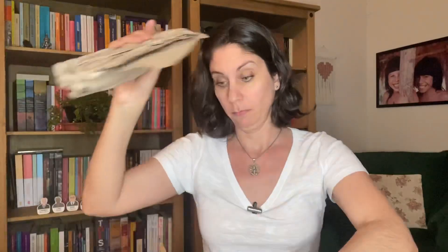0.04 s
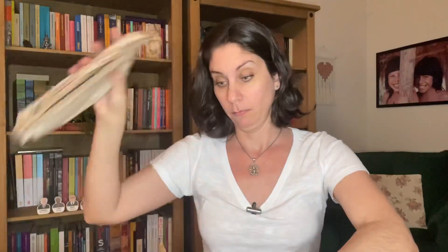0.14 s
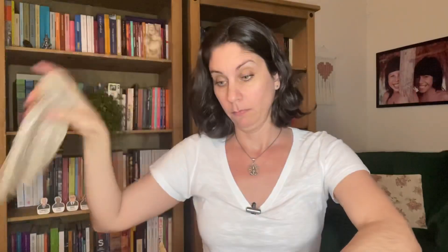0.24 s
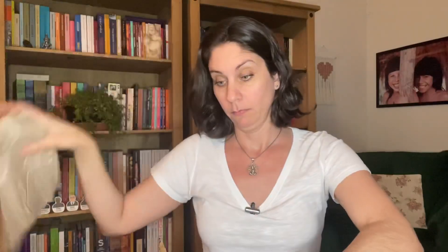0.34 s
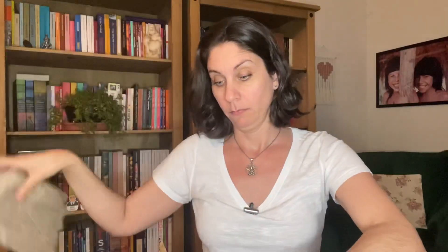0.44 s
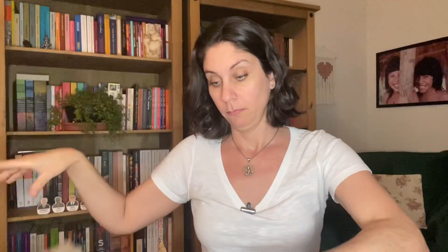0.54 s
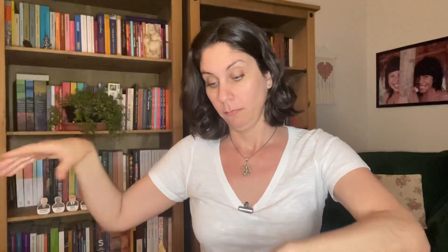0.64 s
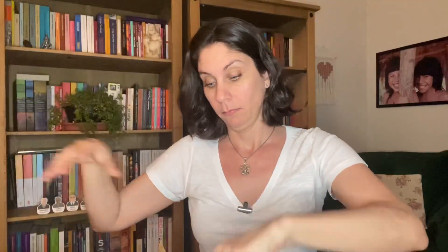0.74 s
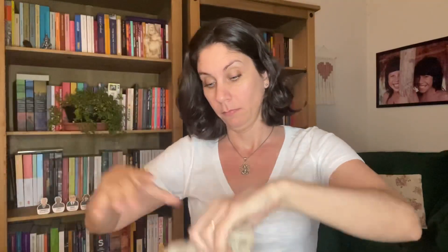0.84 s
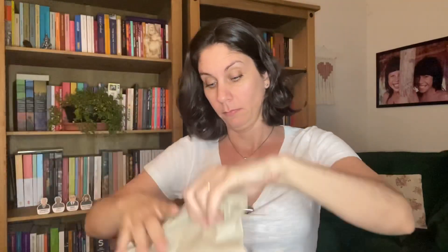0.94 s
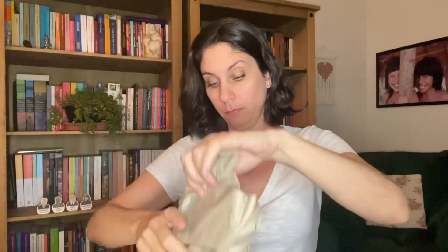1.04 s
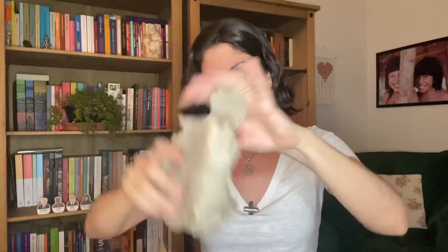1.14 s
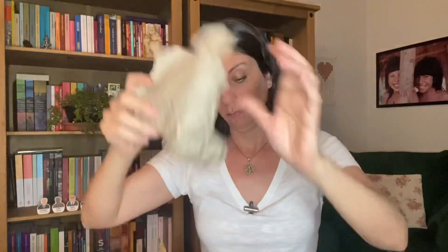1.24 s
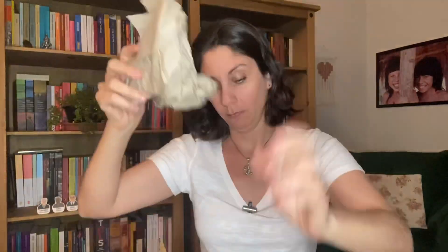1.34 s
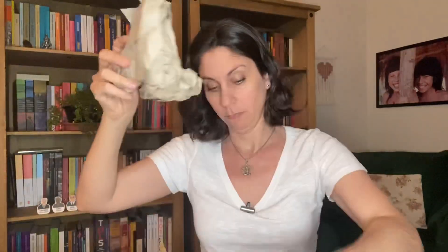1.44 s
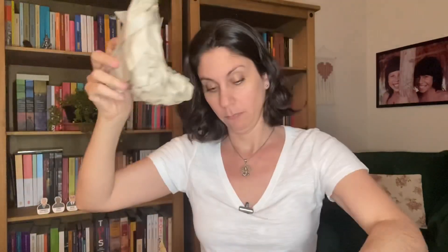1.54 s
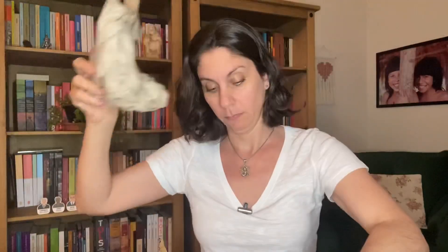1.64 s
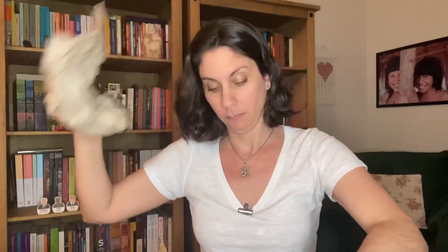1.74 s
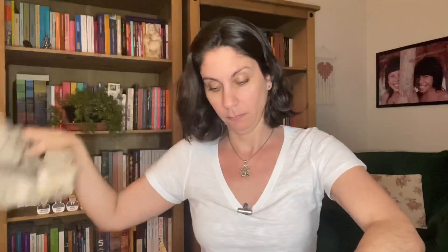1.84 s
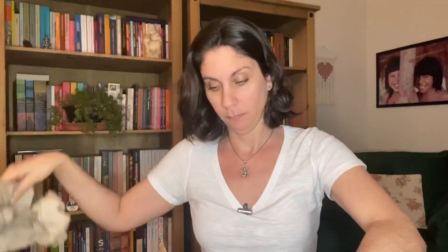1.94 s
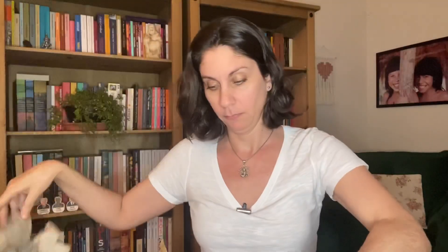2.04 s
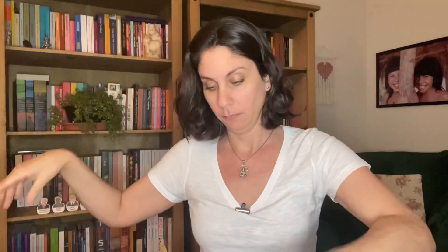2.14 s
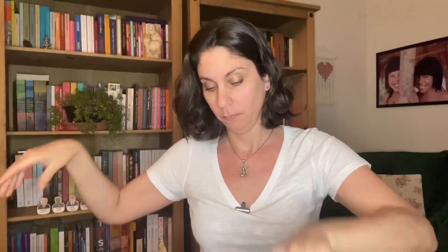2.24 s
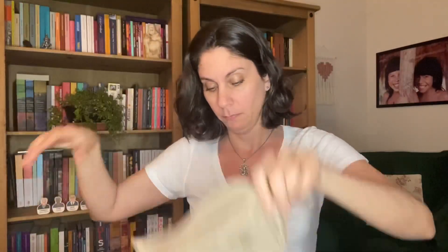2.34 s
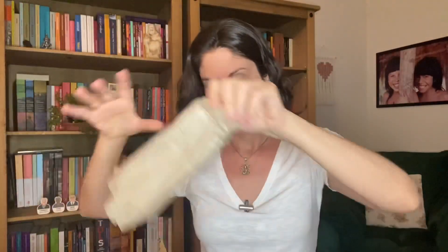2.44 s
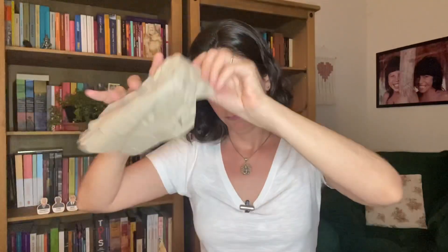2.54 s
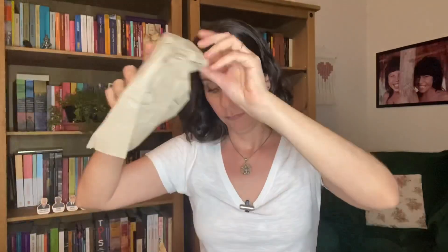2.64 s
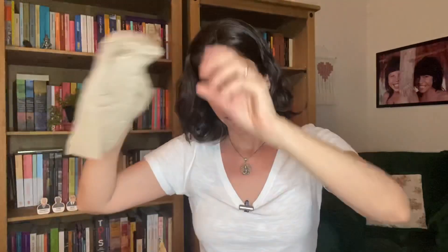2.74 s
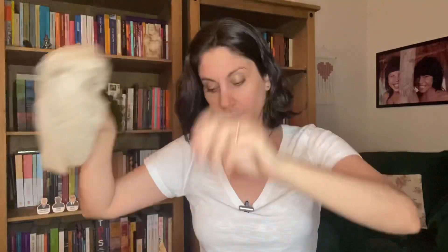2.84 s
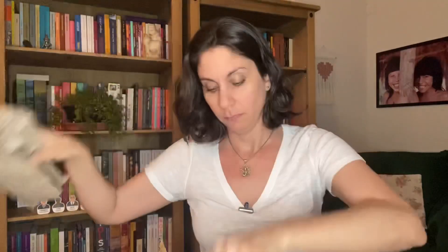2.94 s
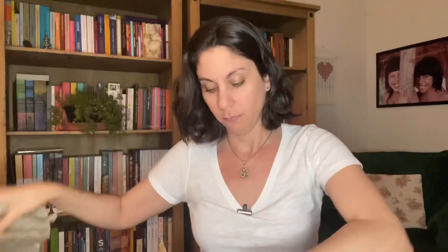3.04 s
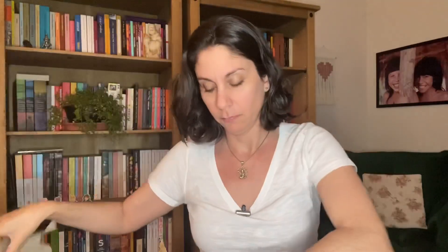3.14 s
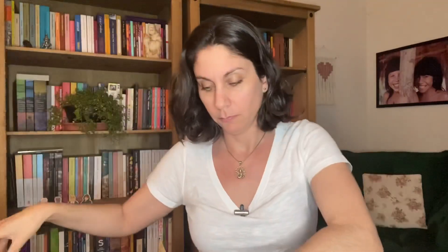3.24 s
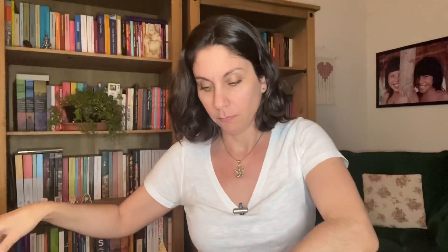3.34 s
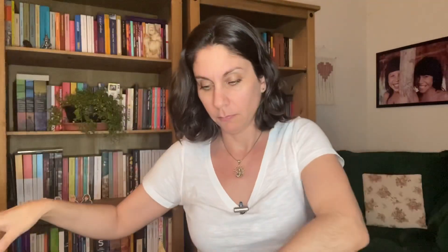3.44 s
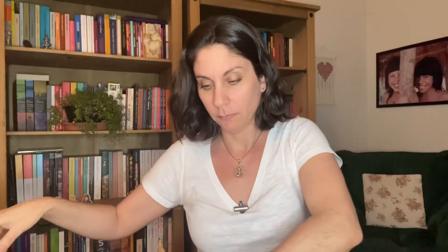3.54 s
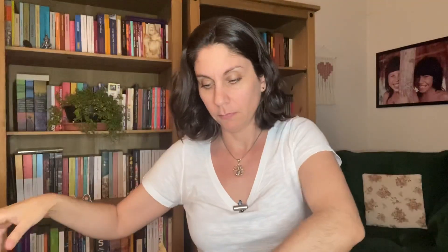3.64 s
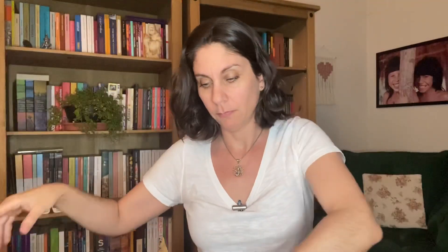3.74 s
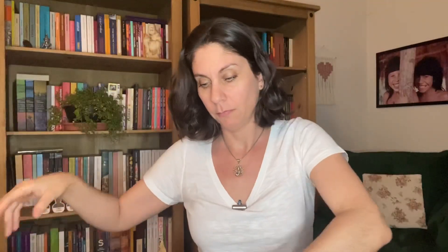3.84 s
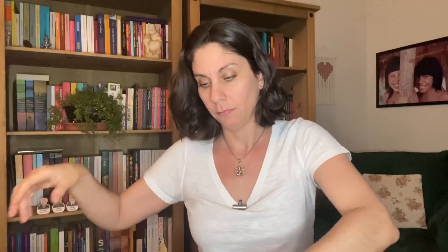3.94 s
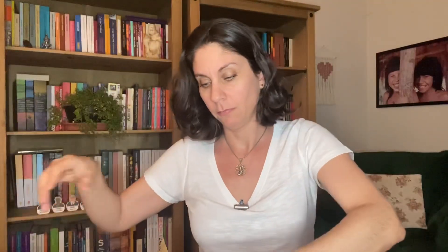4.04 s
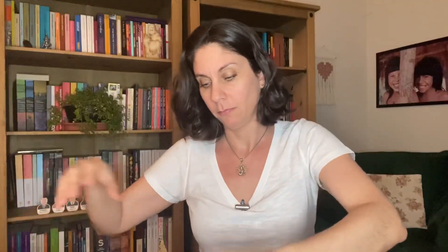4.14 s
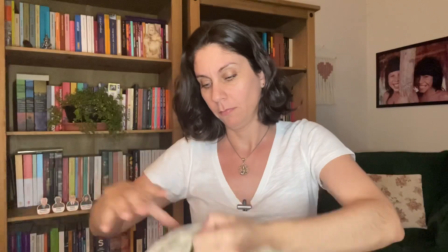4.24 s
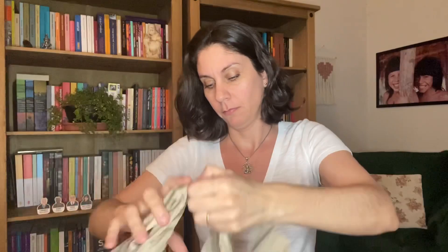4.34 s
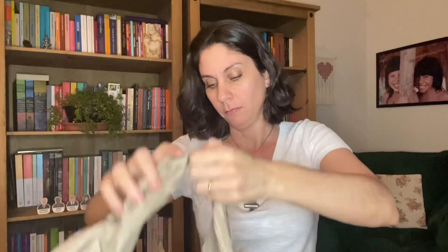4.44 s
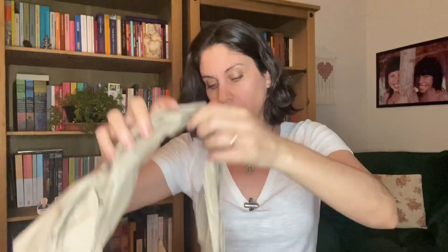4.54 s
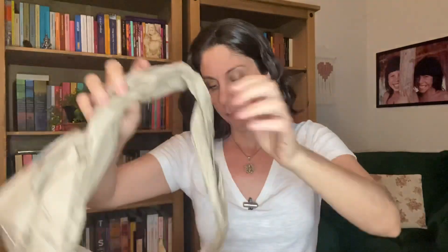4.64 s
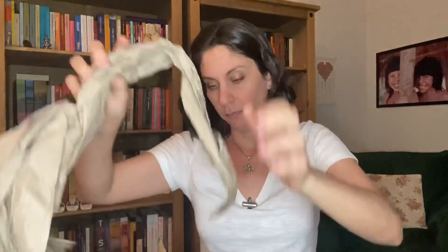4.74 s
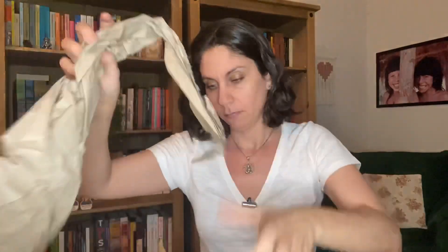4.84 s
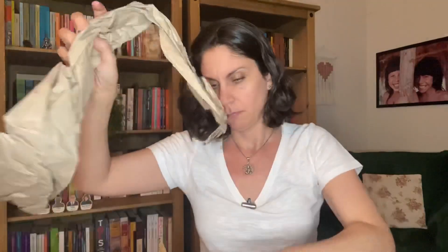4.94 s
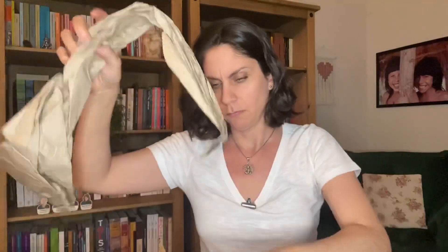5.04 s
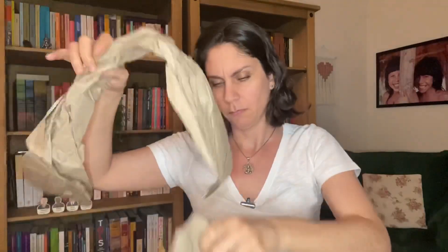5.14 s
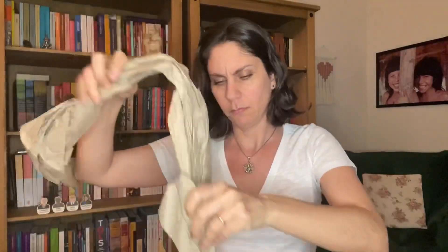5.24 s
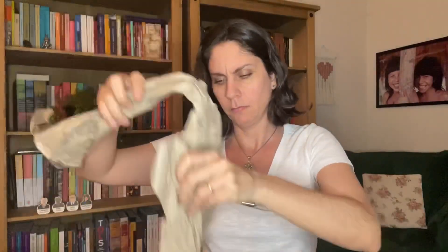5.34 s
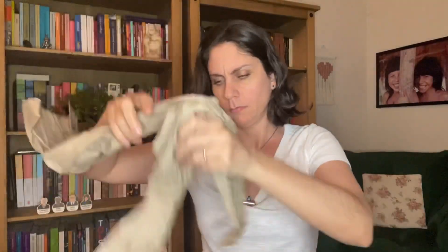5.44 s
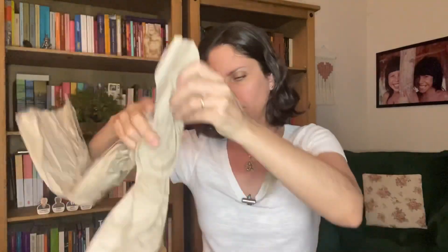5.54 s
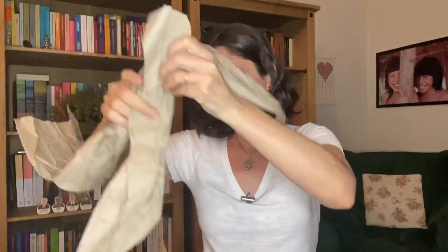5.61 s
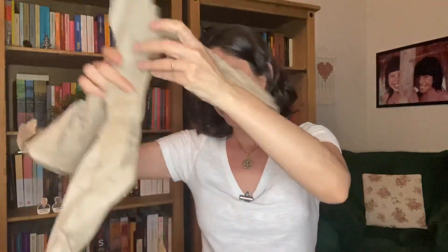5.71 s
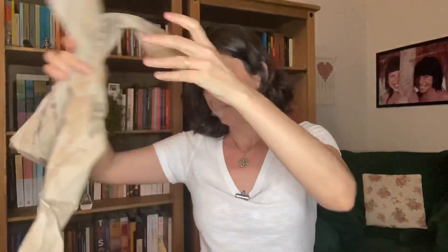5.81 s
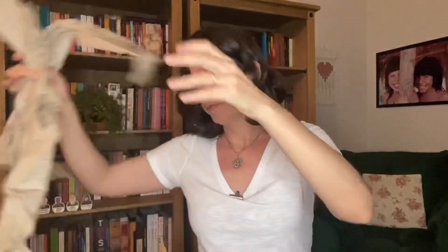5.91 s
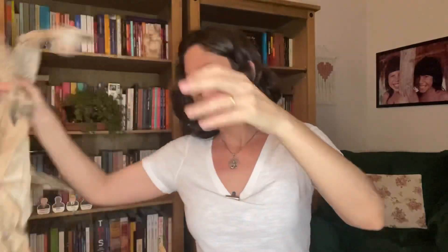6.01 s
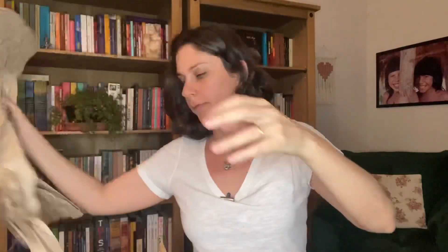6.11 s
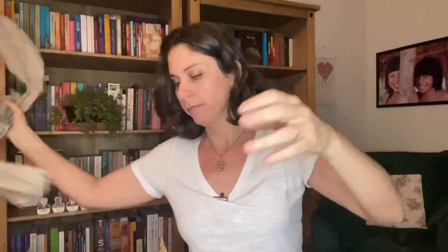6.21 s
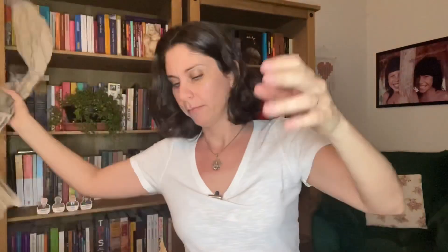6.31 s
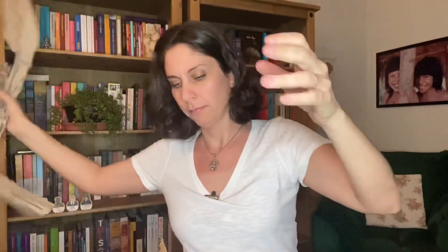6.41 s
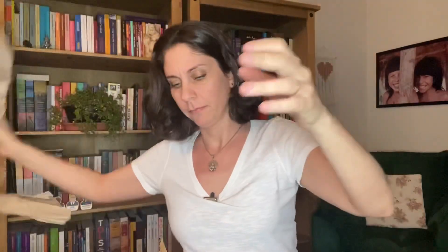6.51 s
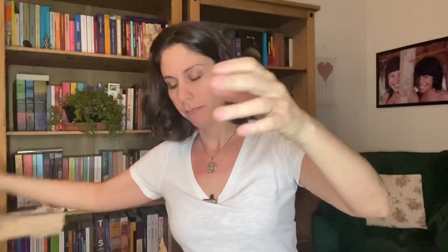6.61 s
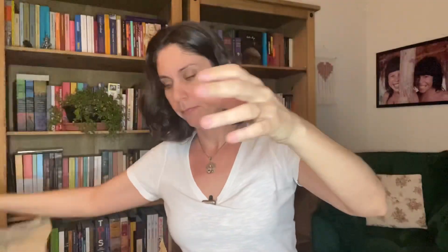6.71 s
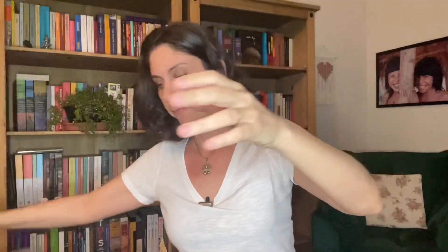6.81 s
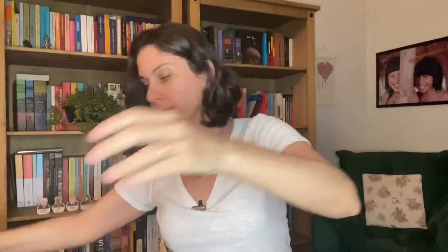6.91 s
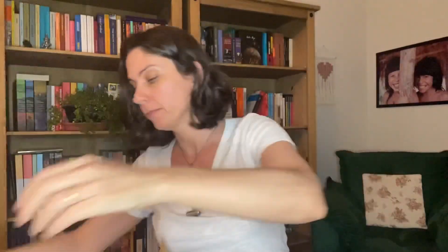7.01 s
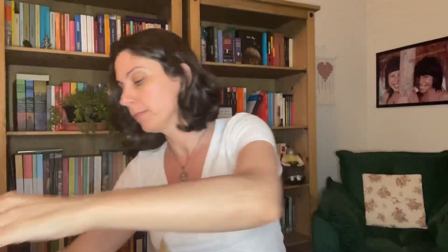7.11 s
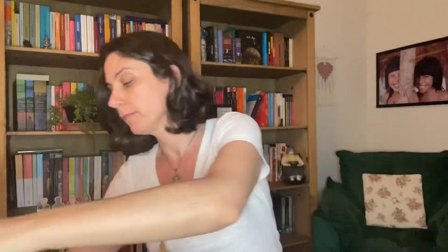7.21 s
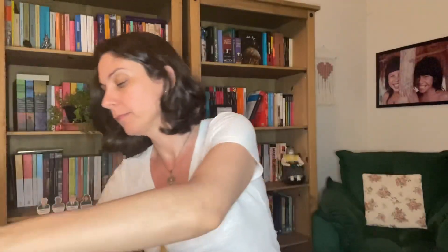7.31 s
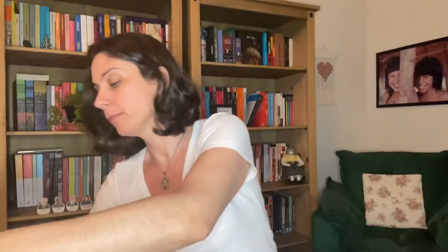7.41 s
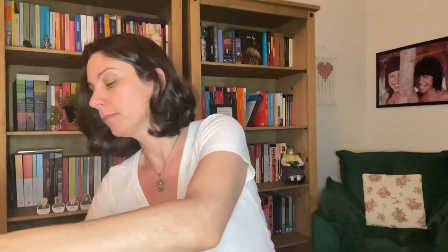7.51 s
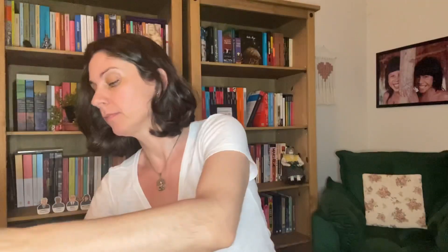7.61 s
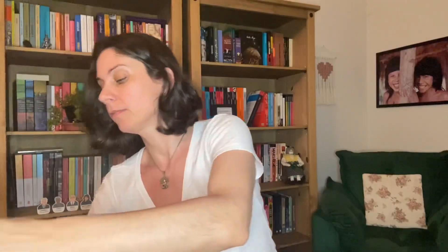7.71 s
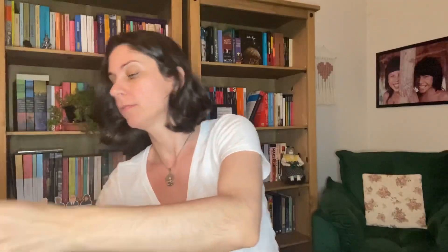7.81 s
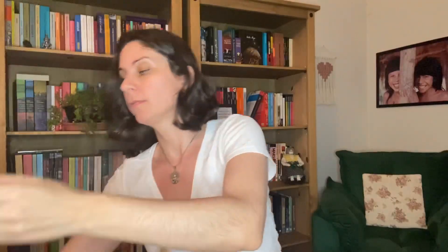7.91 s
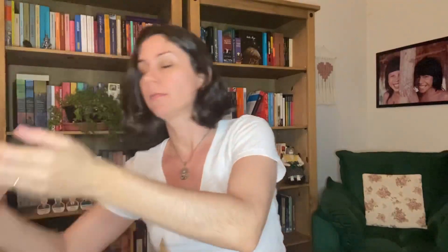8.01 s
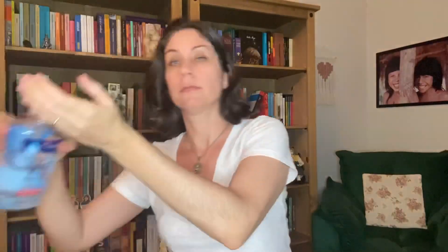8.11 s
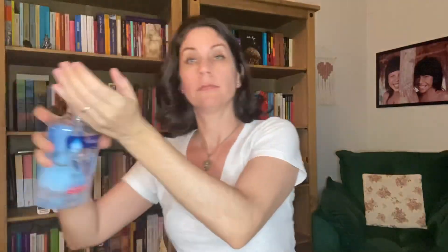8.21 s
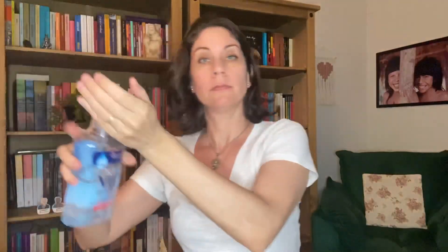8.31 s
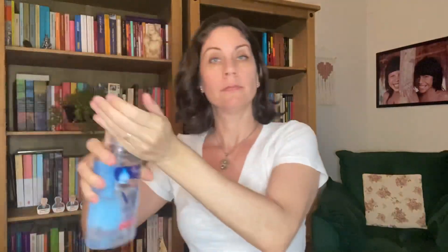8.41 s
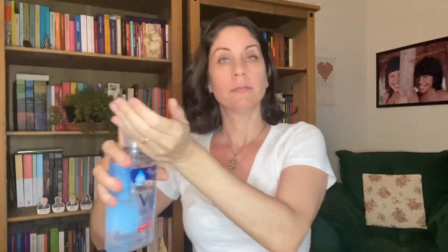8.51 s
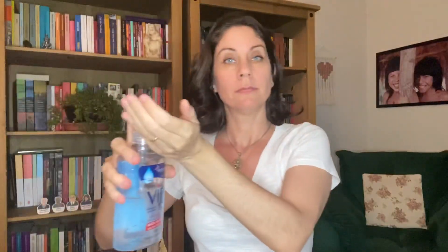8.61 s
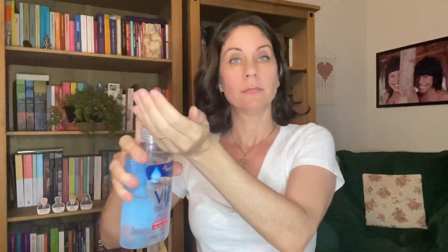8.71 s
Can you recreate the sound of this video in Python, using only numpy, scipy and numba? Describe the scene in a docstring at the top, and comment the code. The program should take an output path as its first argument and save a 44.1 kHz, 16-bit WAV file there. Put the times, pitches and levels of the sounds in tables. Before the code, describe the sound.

Close, crisp paper rustling and crumpling indoors, with cardboard rubs and a few dull knocks, finally dying away to faint clicks and near silence.

```python
"""Sheets of packing paper crackle and snap as they are pulled from a cardboard box, an arm's length from a
pair of microphones. Creases are swarms and short bursts of damped clicks, and a few low thumps are played as
the same bursts; hands rub the box in lower clicks, the table thuds in lower ones still, and knocks ring the
box's modes. Echoes of a furnished room follow the hands. Behind it all lie faint air noise and a low hum
that comes and goes, drifting in pitch."""
import sys
import numpy as np
from scipy import signal
from scipy.fft import rfft, irfft
from scipy.io import wavfile
from numba import njit

SR = 44100
rng = np.random.default_rng(int(sys.argv[2]) if len(sys.argv) > 2 else 0)


def store_wav(level_fs):
    """Save 16-bit WAV to argv[1]."""
    pcm = np.round(np.clip(np.atleast_2d(level_fs), -1, 1) * 32767)
    wavfile.write(sys.argv[1], SR, pcm.T.astype(np.int16))


N = 386312  # samples
LEFT_RIGHT = np.array([[1], [-1]])  # sign of the side signal at each microphone


def undb(db):
    """dB to amplitude gain."""
    return 10 ** (np.asarray(db) / 20)


def on_log(hz, table):
    """Read a two-column table by frequency, straight lines on a log-frequency axis."""
    table_hz, value = np.transpose(table)
    return np.interp(np.log(np.maximum(hz, 1)), np.log(np.maximum(table_hz, 1)), value)


# Air noise of the place, spectrum before scaling to AIR_DB: freq_hz [Hz], density_db [dB per Hz]
AIR_SPECTRUM = [(30, -21.5), (60, 3), (120, -4.5), (250, -9.5), (600, -21.5), (1500, -25), (4000, -41.5),
                (16000, -48.5)]
AIR_DB = -71.5  # rms of the part common to both microphones


def air():
    """Noise shaped by frequency: a common part, and a half-strength part opposed between the microphones."""
    f = np.fft.rfftfreq(N, 1 / SR)
    noise = rfft(rng.standard_normal((2, N)))
    mid, side = irfft(noise * undb(on_log(f, AIR_SPECTRUM)), N)
    return undb(AIR_DB) * (mid + .5 * side * LEFT_RIGHT) / np.std(mid)


# Stretches of low hum: start_s [s], end_s [s], first_hz [Hz], last_hz [Hz], level_db [dB rms]
HUM_STRETCHES = [(2.622, 3.28, 99.8, 100.5, -71.5), (6.406, 7.1, 81, 88.2, -72)]


def hum():
    """Sines that glide in pitch, equal at both microphones, with 0.13 s fades at either end."""
    time = np.arange(N) / SR
    out = np.zeros(N)
    for start_s, end_s, first_hz, last_hz, level_db in HUM_STRETCHES:
        fade = np.clip(np.minimum(time - start_s, end_s - time) / 0.13, 0, 1)
        pitch_hz = np.interp(time, [start_s, end_s], [first_hz, last_hz])
        sine = np.sin(2 * np.pi * np.cumsum(pitch_hz) / SR)
        out += np.sqrt(2) * fade * undb(level_db) * sine
    return out


# How long the room rings, time to fall 60 dB: freq_hz [Hz], t60_s [s]
ROOM_DECAY = [(60, 0.66), (500, 0.62), (4000, 0.58), (16000, 0.32)]
ROOM_DB, ROOM_ALIKE_HZ = -4.5, 600  # echo energy; below this pitch the two microphones grow alike


def echoes():
    """Dense echoes from one place in the room: they die band by band, the bass alike at both microphones."""
    t, f = np.arange(SR) / SR, np.fft.rfftfreq(SR, 1 / SR)
    mid, side = rfft(rng.standard_normal((2, SR)))
    pair = mid + side * f / np.hypot(f, ROOM_ALIKE_HZ) * LEFT_RIGHT
    tail = 0
    for hz in 30 * 2. ** np.arange(10):  # overlapping octave bands
        band_gain = np.clip(1 - abs(np.log2((f + 1) / hz)), 0, 1)
        band = irfft(pair * band_gain, SR)
        tail = tail + band * undb(-60 * t / on_log(hz, ROOM_DECAY))
    tail = tail * np.clip((t - .004) / 0.0025, 0, 1)  # echoes set in after 4 ms
    return tail * undb(ROOM_DB) / np.sqrt(np.sum(tail ** 2) / 2)


def room(x):
    """The hands sweep between three places, each with its own echoes; the shares keep constant power."""
    turn = np.pi * np.arange(N) / SR / 1.2
    source = x.mean(0)[None]
    out = 0
    for place in range(3):
        share = np.sqrt(2 / 3) * np.cos(turn + place * np.pi / 3)
        out = out + signal.oaconvolve(source * share, echoes(), axes=1)[:, :N]
    return out


@njit
def rings(n, start, hz, t60, rise, gain):
    """Sum of damped sines that swell over the rise time [s]; start in samples, which may be fractional."""
    out = np.zeros(n)
    for k in range(len(start)):
        s = (2j * np.pi * hz[k] - np.log(1000) / t60[k]) / SR
        first = int(start[k]) + 1
        z, step = gain[k] * np.exp(s * (first - start[k])), np.exp(s)
        unrisen, rise_step = 1., np.exp(-1 / (rise[k] * SR))
        for j in range(max(first, 0), min(n, first + int(t60[k] * SR) + 2)):
            unrisen *= rise_step
            out[j] += z.imag * (1 - unrisen)
            z *= step
    return out


# Where the hands are, for a sound LEFT_DB louder at the left microphone:
# time_s [s], left_lead_ms [ms by which the left microphone hears it first]
HAND_PLACE = [(0, 0.11), (.6, 0.069), (1, 0.15), (1.9, 0.052), (2.5, 0.059), (3.6, 0.1), (4.4, 0.19),
              (5, 0.1754), (5.9, 0.193), (6.7, 0.37), (7.1, 0.317), (8.76, 0.271)]
LEFT_DB = 3  # left over right, in full from 500 Hz up


def heard(s, hz, t60, rise, gain, side_db):
    """Rings at both microphones; side_db makes the left nearer: earlier, and louder above the bass."""
    lead_ms = np.interp(s, *np.transpose(HAND_PLACE)) + 0.0099 * (side_db - LEFT_DB)
    half_lead = lead_ms * SR / 2000  # samples
    half_db = side_db * np.clip(hz / 500, .4, 1) / 2
    return np.array([rings(N, s * SR - way * half_lead, hz, t60, rise, gain * undb(way * half_db))
                     for way in (1, -1)])


def swarm(per_s, lo_hz, hi_hz, cycles, scatter_db, spread_db, surge_db, level_db):
    """Random damped clicks, pitch even on a log scale, some larger; level_db(s, hz) sets their level."""
    u = rng.random((int(per_s * N / SR), 6)).T
    s = u[0] * N / SR
    hz = lo_hz * (hi_hz / lo_hz) ** u[1]
    size = undb(-scatter_db * np.log(u[2] + 0.0023)) * np.sign(u[3] - .5)
    # one slip sets off its neighbours: clicks close in time share a size and favour the same pitches
    slips = np.cumsum(rng.exponential(.012, 4000))
    surge, colour = rng.standard_normal((4001, 2))[np.searchsorted(slips, s)].T
    favour = 0.78 * np.cos(2.481 * np.log2(hz) + 2 * np.pi * colour)
    size = size * undb(surge_db * (surge + favour))
    t60 = cycles * (.5 + u[5]) / hz
    energy = t60 / (4 * np.log(1000))
    gain = size * undb(level_db(s, hz)) / np.sqrt(per_s * energy * np.mean(size ** 2))
    return heard(s, hz, t60, t60 / 10, gain, LEFT_DB + spread_db * (u[4] - .5))


SLOPE_DB = 20  # a swell or a fade spans this much in its stated time, and runs on


def bursts(t, s, swell, fade, db):
    """Power of each burst at times t: it swells to its peak and fades, both straight in dB."""
    late = t[:, None] - s
    drop = np.where(late < 0, -late / swell, late / fade)
    return undb(db - SLOPE_DB * drop) ** 2


# Tugs at the paper, relative levels: peak_s [s], swell_s [s], fade_s [s], crackle_db [dB],
# coarse_db [dB, coarse creases against fine ones]
PAPER_TUGS = [(0.065, 0.0756, 0.36, -50.5, -0.5), (0.189, 0.027, 0.039, -41, -16.5),
              (.288, 0.045, 0.0143, -40.5, 0), (.43, 0.16, 0.24, -44, 4.5), (0.601, 0.27, 0.44, -48.5, 18),
              (.765, 0.16, 0.23, -35, 4), (.87, 0.32, 0.019, -27.5, 1.5), (0.97, 0.035, 0.034, -25.5, -2.5),
              (1.05, 0.13, 0.15, -37, -4.5), (1.127, 0.0303, 0.13, -31.5, -3.5),
              (1.2, 0.036, 0.1236, -30, -1.5), (1.235, 0.054, 0.059, -31, -4.5), (1.3, .05, 0.66, -65.5, 5),
              (1.614, 0.0109, 0.043, -44, 8.5), (1.768, 0.0435, 0.068, -37, 1),
              (1.824, 0.016, 0.0275, -35, -1), (1.91, 0.022, 0.99, -54, 4.5), (2.07, 0.26, .1, -50.5, -3),
              (2.158, 0.18, 0.088, -32.5, 4), (2.224, 0.11, 0.052, -34, -1.5),
              (2.434, 0.0189, 0.13, -34, 3.5), (2.572, 0.024, 0.031, -31, 1),
              (2.618, 0.024, 0.02, -25, -13.5), (2.65, 0.042, 0.13, -41.5, 0),
              (3.07, 0.91, 0.022, -64.5, 0), (3.162, 0.0486, 0.096, -42.5, -2.5),
              (3.287, 0.06, 0.0355, -46, 5), (3.44, 0.303, 0.4, -54, 11), (3.501, 0.021, 0.16, -36.5, 5),
              (3.631, 0.05, 1, -37.5, 1), (3.785, 0.116, 0.37, -34, -2), (4.03, 0.25, 0.14, -37, -6),
              (4.18, 0.17, 0.086, -30.5, -3), (4.228, 0.024, 0.104, -31, -7.5),
              (4.329, 0.037, 0.22, -29, -7.5), (4.385, 0.14, 0.111, -28.5, 2.5),
              (4.56, 0.26, 0.43, -35, -5.5), (4.67, 0.27, 0.17, -35, -11.5), (4.789, 0.28, 0.05, -43, 4.5),
              (4.943, 0.0028, 0.66, -46, 0), (5.02, 0.022, 0.19, -48, 0.5),
              (5.129, 0.11, 0.087, -33.5, -5.5), (5.2, 0.276, 0.74, -39.5, 5),
              (5.34, 0.33, 0.39, -39, -9.5), (5.421, 0.066, 0.015, -28.5, 2),
              (5.528, 0.056, 0.12, -34, 4.5), (5.58, .1, 0.48, -46.5, 4.5), (5.734, 0.12, 0.06, -32, -7.5),
              (5.991, 0.7, 0.11, -38.5, -6.5), (6.051, 0.098, 0.15, -34, -11),
              (6.108, 0.076, 0.0067, -31.5, -0.5), (6.16, 0.046, 0.33, -51.5, 1.5),
              (6.29, 0.055, 0.123, -45, -1.5), (6.375, 0.065, 0.364, -51, -0.5),
              (6.54, 0.0053, 0.13, -56.5, 12), (6.77, 0.1005, 0.18, -47, 3), (7.046, 0.0097, 0.21, -36, 6),
              (7.1, 0.033, 0.11, -36, -1), (7.184, 0.097, 0.087, -37, 5), (7.245, 0.046, 0.19, -48.5, 8),
              (7.63, 0.063, 0.27, -59.5, 2), (7.725, 0.047, 0.148, -68, 10.5),
              (7.81, 0.12, 0.32, -67.5, -1), (7.99, 0.16, 0.054, -67, -2),
              (8.18, 0.0092, 0.124, -63.5, -0.5), (8.33, 0.049, 0.27, -62, 0),
              (8.414, 0.106, 0.13, -53.5, -8.5), (8.56, 0.16, 0.055, -64, 5)]
# How much of the crackle reaches box and table: time_s [s], rub_db [dB against crackle],
# thud_db [dB against crackle], thud_tilt_db [dB per octave]
BOX_CONTACT = [(0, -12, -45, -2), (.5, -32.5, -37, 1.5), (.62, -22, -8.5, -2), (1.3, -14.5, -10, -4.5),
               (2, -4, 0, 4.5), (2.9, -15, -15, 5), (3.7, -2.5, -6, 2.5), (4.6, -12, -10, 1),
               (5.3, -6.5, -10.5, 0), (5.8, -10, -1, -2), (6.3, -7.5, -6, -3.5), (6.8, -25, -30, 1),
               (7.099, -3.5, -5.5, 11), (7.6, -8, -7.5, 2), (8.76, -13, -21.5, -3)]
# Hands shove the box, relative levels: peak_s [s], fade_s [s], rub_db [dB], thud_db [dB]
BOX_SHOVES = [(.584, 0.24, -66, -46), (.738, 0.21, -37.5, -62.5), (.876, 0.147, -29.5, -29),
              (.94, 0.16, -60, -36), (1.222, 0.052, -35.5, -69.5), (1.615, 0.037, -46, -35),
              (1.792, 0.059, -39.5, -39), (1.836, 0.0113, -37.5, -59), (2.434, 0.065, -37.5, -55),
              (2.617, 0.034, -31, -50.5), (3.228, 0.022, -32.5, -38.5), (3.307, 0.0646, -37, -44.5),
              (3.43, 0.16, -35, -50), (3.493, 0.1, -25.5, -53), (4.064, 0.11, -32.5, -31.5),
              (4.391, 0.082, -28.5, -28.5), (4.999, 0.087, -39.5, -40), (5.14, 0.68, -46, -55),
              (5.532, 0.021, -27.5, -19.5), (6.109, 0.039, -57, -37), (7.106, 0.099, -37.5, -52),
              (7.184, 0.071, -40, -40)]
SHOVE_SWELL = 0.43  # swell time as a fraction of the fade


def handling():
    """Hand forces as times, then dB of the crackle, its coarse share, the rubbing and the thudding."""
    t = np.arange(0, N / SR, .002)
    s, swell, fade, crackle_db, coarse_db = np.transpose(PAPER_TUGS)
    tugs = bursts(t, s, swell, fade, crackle_db)
    crackle = tugs.sum(1) + 1e-12
    contact_s, *contact_db = np.transpose(BOX_CONTACT)[:3]
    shove_s, shove_fade, *shove_db = np.transpose(BOX_SHOVES)
    powers = []
    for against_db, peak_db in zip(contact_db, shove_db):  # rubbing, then thudding
        passed_on = crackle * undb(np.interp(t, contact_s, against_db)) ** 2
        shoves = bursts(t, shove_s, SHOVE_SWELL * shove_fade, shove_fade, peak_db)
        powers.append(passed_on + shoves.sum(1))
    rub, thud = powers
    return t, 10 * np.log10(crackle), tugs @ coarse_db / crackle, 10 * np.log10(rub), 10 * np.log10(thud)


def rubbing_and_thuds():
    """Rubbing makes the cardboard stutter in mid-low clicks; the table thuds under it in low ones."""
    t, _, _, rub_db, thud_db = handling()
    tilt_s, tilt_db = np.transpose(BOX_CONTACT)[[0, 3]]

    def rub_level(s, hz):
        return np.interp(s, t, rub_db) + 3.0

    def thud_level(s, hz):
        return np.interp(s, t, thud_db) + np.interp(s, tilt_s, tilt_db) * np.log2(hz / 110)

    rub = swarm(per_s=900., lo_hz=289.6, hi_hz=653.0, cycles=11.46, scatter_db=1.0, spread_db=3.8,
                surge_db=1.1, level_db=rub_level)
    thud = swarm(per_s=400., lo_hz=45.9, hi_hz=228.7, cycles=7.0, scatter_db=0.56, spread_db=2.5,
                 surge_db=0.5, level_db=thud_level)
    return rub + thud


# Blows on the box: start_s [s], level_db [dB, relative], contact_ms [ms]
BOX_KNOCKS = [(0.575, -34, 1.62), (1.604, -30, 4.24), (1.833, -31.5, 0.97), (2.427, -23, 2.8),
              (3.223, -37, 1.04), (3.404, -37.5, 1.5), (3.482, -28.5, 1.6), (3.495, -28.5, 3.2),
              (3.511, -30, 2), (3.538, -31.5, 1.63), (4.046, -31, 3.65), (4.331, -23, 1), (5.519, -3, 3.33),
              (5.526, -14, 2.19), (7.096, -38, 2.55), (7.805, -50, 3.43), (7.979, -50, 3.65),
              (8.178, -57, 2.34), (8.403, -60, 1.6)]
# Resonances of the cardboard box: pitch_hz [Hz], level_db [dB, relative], t60_s [s]
CARDBOARD_MODES = [(69, -18, 0.29), (114.35, -4, 0.051), (193.9, -4, 0.16), (258, -4, 0.086),
                   (380, -16.5, 0.039), (500.8, 3.5, 0.14), (668, -2, 0.029), (788.7, 7.5, 0.047)]


def knocks():
    """Each blow rings the box's modes; a longer push swells slower and misses the high modes."""
    s, level_db, contact_ms = np.transpose(BOX_KNOCKS)[:, :, None]
    hz, mode_db, t60 = np.transpose(CARDBOARD_MODES)
    where = rng.uniform(-0.38, 1, (len(s), len(hz)))  # each blow lands elsewhere
    contact_s = contact_ms / 1000
    soft = 1 / (1 + (hz * contact_s) ** 2)
    sign = np.sign(np.cos(3 * np.arange(len(hz))))
    gain = undb(level_db + mode_db - 6.5 + 1.8 * where) * soft * sign
    every = np.ones_like(gain)  # one ring per blow and mode
    return heard(*((v * every).ravel() for v in (s, hz, t60, contact_s, gain, LEFT_DB)))


# Colour of the paper crackle, relative: freq_hz [Hz], density_db [dB per Hz]
PAPER_COLOUR = [(600, 0.5), (900, 2.5), (1400, 1), (2200, -0.5), (2800, 1.5), (3400, -4.5), (4100, -3),
                (5200, -6), (7000, -6), (9300, -10.5), (11500, -15), (16000, -13.5)]


def crackle():
    """Creases buckle in a dense swarm of clicks, coarser when large folds give way."""
    t, fine_db, coarse_db = handling()[:3]

    def level_db(s, hz):
        coarse = np.clip(np.log(3000 / hz) / np.log(3), 0, 1)  # share that follows the large folds
        octave_db = on_log(hz, PAPER_COLOUR) + 10 * np.log10(hz / 1000)  # clicks are even per octave
        return np.interp(s, t, fine_db) + coarse * np.interp(s, t, coarse_db) + octave_db + 4.0

    return swarm(per_s=9000., lo_hz=632.0, hi_hz=14470.0, cycles=7.15, scatter_db=0.75, spread_db=21.0,
                 surge_db=1.63, level_db=level_db)


# Snaps of the paper, and a few low thumps played as the same short burst: start_s [s],
# level_db [dB, relative], pitch_hz [Hz], edge_db [dB, crisp edge against level_db, before the lift below]
SNAPS_AND_THUMPS = [(0.045, -35, 895, -17.5), (0.0652, -31.5, 874, -11), (0.112, -32.5, 929, -11.5),
                    (0.1904, -22.5, 3148, -22.5), (0.209, -15.5, 2600, -26.5), (0.2269, -26, 3040, -14.5),
                    (0.233, -29.5, 1207, -29), (0.262, -23.5, 2200, -6.5), (0.267, -17, 1290, -15.5),
                    (0.2719, -25.5, 1096, -10), (0.278, -21.5, 2900, -19.5), (0.286, -25.5, 1412, -12),
                    (0.313, -28, 2700, -21.5), (0.399, -19, 4700, -13.5), (0.4475, -27, 938, -18),
                    (0.462, -24, 2900, -22.5), (0.5042, -27, 2910, -12), (0.52, -26.5, 1100, -23.5),
                    (0.5734, -23, 2600, -12), (0.585, -32, 900, -21), (0.625, -29, 1287, -5.5),
                    (0.627, -30, 3800, -20.5), (0.7584, -18, 973, -14.5), (0.7737, -9, 1133, -18),
                    (0.7934, -13.5, 777, -17.5), (0.8326, -12, 868.5, -15), (0.865, -16.5, 1089, -18.5),
                    (0.878, -18.5, 672, -6), (0.896, -16, 420, -22), (0.911, -28, 332, -28.5),
                    (0.921, -22, 244, -28), (0.9546, -15.5, 1707, -18), (1.106, -26.5, 1680, -10),
                    (0.978, -29.5, 1700, -1.5), (1.2204, -17, 1060, -10.5), (1.6074, -20.5, 1540, -38),
                    (1.7015, -37, 3700, -16), (1.764, -39, 1730, -20.5), (1.82, -22.5, 2200, -17),
                    (1.828, -27, 1100, -31), (1.836, -16, 600, -24.5), (1.9838, -28.5, 810, -16.5),
                    (2.008, -29, 2800, -24.5), (2.0276, -21.5, 4080, -25), (2.0822, -28.5, 700, -14.5),
                    (2.1127, -24, 847, -16), (2.1494, -24.5, 1006, -32.5), (2.178, -14.5, 560, -16.5),
                    (2.199, -17.5, 1171, -16.5), (2.221, -32, 1410, -18), (2.2386, -17, 1130, -16.5),
                    (2.243, -18.5, 1486, -15.5), (2.276, -34, 2993, -8), (2.4229, -27.5, 802, -20),
                    (2.4324, -20.5, 808, -23), (2.5519, -23.5, 1470, -26), (2.5686, -31.5, 832, -6),
                    (2.614, -18.5, 1094, -12), (2.6802, -22, 1750, -15), (2.6952, -19.5, 1150, -15.5),
                    (2.808, -29.5, 1300, -23), (3.143, -35, 875, -23.5), (3.499, -41.5, 1050, -9.5),
                    (3.659, -32.5, 1300, -15), (3.705, -24, 1200, -16.5), (3.777, -29, 1600, -13),
                    (3.787, -25.5, 900, -16), (3.813, -22.5, 3000, -10.5), (3.859, -17, 1006, -21),
                    (4.0295, -30, 826, -16.5), (4.058, -17.5, 289, -40), (4.1248, -18.5, 1024, -22.5),
                    (4.1455, -17.5, 2677, -14.5), (4.1715, -22, 1094, -10.5), (4.175, -16, 838, -12.5),
                    (4.1808, -17.5, 2490, -14.5), (4.222, -12.5, 1000, -17), (4.227, -12.5, 874, -17.5),
                    (4.2315, -13.5, 794, -18.5), (4.2345, -16.5, 693, -12.5), (4.265, -20.5, 750, -18),
                    (4.3263, -18.5, 852, -15), (4.36, -21, 2600, -14.5), (4.38, -18, 900, -16.5),
                    (4.4049, -12, 2420, -25), (4.566, -27, 3200, -14), (4.6357, -18.5, 3300, -14.5),
                    (4.7094, -14, 3990, -14.5), (4.746, -27.5, 900, -20.5), (4.78, -20.5, 4010, -16),
                    (4.9445, -38, 3940, -9), (5.0225, -31, 1010, -13), (5.0469, -19.5, 3120, -19.5),
                    (5.096, -17, 2770, -16.5), (5.105, -20, 4700, -14), (5.1177, -17.5, 1195, -11),
                    (5.128, -23, 2800, -18), (5.1674, -28, 3089, -11), (5.217, -23, 811.4, -21),
                    (5.2734, -13, 1700, -24.5), (5.277, -19, 795, -21), (5.3104, -13.5, 824.2, -23),
                    (5.312, -20.5, 3000, -19), (5.3931, -21.5, 1326, -12), (5.408, -19.5, 1311, -16.5),
                    (5.417, -16.5, 1105, -20), (5.425, -18.5, 1500, -19), (5.431, -18.5, 1170, -10),
                    (5.5281, -8.5, 1515, -23.5), (5.657, -12.5, 1950, -22), (5.7199, -19.5, 2750, -14),
                    (5.81, -29, 900, -11), (5.898, -32.5, 4190, -19), (5.917, -22.5, 892, -27),
                    (5.953, -27, 3400, -9.5), (6.09, -31.5, 3600, -14), (6.1019, -23, 3850, -7),
                    (6.148, -18.5, 4100, -26), (6.269, -30, 3010, -17), (6.288, -37.5, 872, -14),
                    (6.355, -28, 4030, -16), (6.533, -26, 2815, -40), (6.7265, -32.5, 4220, -19.5),
                    (6.743, -36, 2880, -21.5), (6.7589, -31.5, 2720, -13), (6.7685, -31, 4000, -22),
                    (6.783, -39, 2500, -25), (6.804, -44, 3100, -28), (7.0439, -27, 945, -9),
                    (7.0944, -21.5, 2970, -20), (7.167, -15, 1360, -29), (7.625, -59.5, 2500, -20),
                    (7.72, -54, 1600, -14), (7.985, -53, 900, -15), (8.1766, -46.5, 1050, -20),
                    (8.307, -56, 3000, -18), (8.391, -53, 4000, -30), (8.405, -49.5, 4100, -30),
                    (8.417, -47.5, 3887, -30)]
EDGE_LO_HZ, EDGE_HI_HZ, EDGE_LIFT_DB = 2300, 15000, 14
BURST_FADE_DB_PER_S, BURST_CYCLES = 2400, 12  # fade from click to click; most cycles a click rings


def snaps_and_thumps():
    """Each snap or thump is a fading burst of clicks, one near its pitch to four of a crisp edge."""
    s, level_db, pitch_hz, edge_db = np.transpose(SNAPS_AND_THUMPS)[:, :, None]
    step, part = np.divmod(np.arange(25), 5)  # five steps of five clicks
    edge = part > 0
    u = rng.random((len(s), 3, len(step))).transpose(1, 0, 2)
    late = np.cumsum(u[0] * (step > 0), axis=1) * .0004  # s; the first step is simultaneous
    quarter = (part - 1 + u[1]) / 4  # each edge click keeps to its quarter of the band
    edge_hz = EDGE_LO_HZ * (EDGE_HI_HZ / EDGE_LO_HZ) ** quarter
    body_hz = pitch_hz * 2 ** (np.minimum(step, 2) * 0.2 * (u[1] - .5))
    hz = np.where(edge, edge_hz, body_hz)
    click_db = level_db + edge * (edge_db + EDGE_LIFT_DB) - 4.0 * (step == 0)
    gain = undb(click_db - BURST_FADE_DB_PER_S * late - 6.1 * u[2])
    side_db = LEFT_DB + 8.2 * (u[0, :, :1] - .5) + 0 * hz  # one place per burst
    t60 = np.minimum(BURST_CYCLES, 4 + hz / 450) / hz
    return heard(*(v.ravel() for v in (s + late, hz, t60, 0.31 / hz, gain, side_db)))


def paper():
    """Crackle, snaps and thumps, thinned below 222 Hz."""
    low_cut = signal.butter(4, 222, "high", fs=SR, output="sos")
    return signal.sosfilt(low_cut, crackle() + snaps_and_thumps())


def scene():
    """Paper and box, direct and through the room, over the air and the hum."""
    near = paper() + rubbing_and_thuds() + knocks()
    return undb(-0.5) * (near + room(near)) + air() + hum()


# Treble shared by the two microphone ports in one housing: freq_hz [Hz], likeness [0-1],
# right_lag_rad [radians the right lags]
SHARED_TREBLE = [(4970, 0.03, 2), (5700, 0.19, 4), (6750, 0.43, 3), (7570, 0.6, 2), (8340, .65, 1.15),
                 (8980, .95, 0.65), (9760, .95, 0.5), (11073, 0.5, 1), (11820, .95, -4), (13610, .95, -3.5),
                 (14300, .85, -5.5), (16000, 0.85, -7)]
TOP_HZ = 15900


def record(dry):
    """The ports share the treble; the recorder cuts the deepest bass and the top."""
    hz, likeness, lag_rad = np.transpose(SHARED_TREBLE)
    f = np.fft.rfftfreq(N, 1 / SR)
    alike = np.clip(np.interp(f, hz, likeness), 0, 1)
    left, right = rfft(dry)
    lagged_left = left * np.exp(-1j * np.interp(f, hz, lag_rad))
    right = np.sqrt(1 - alike ** 2) * right + alike * lagged_left
    bass_cut = signal.butter(2, 35, "high", fs=SR, output="sos")
    top_cut = signal.ellip(10, .2, 80, TOP_HZ, fs=SR, output="sos")
    return signal.sosfilt(top_cut, signal.sosfilt(bass_cut, irfft([left, right], N)))


dry = scene()
out = record(dry)
store_wav(out)
```